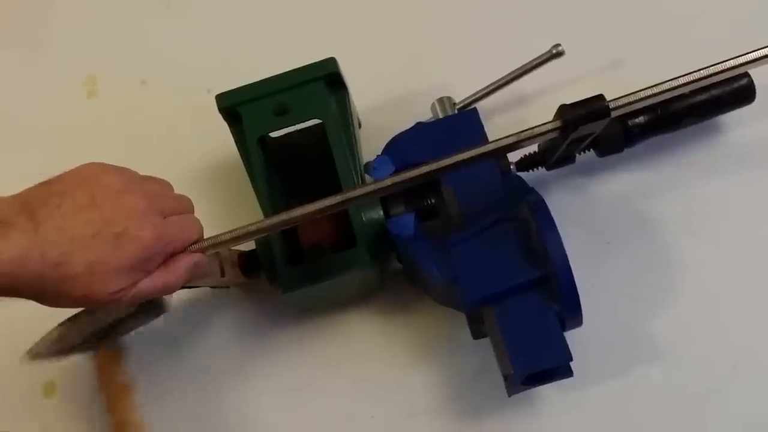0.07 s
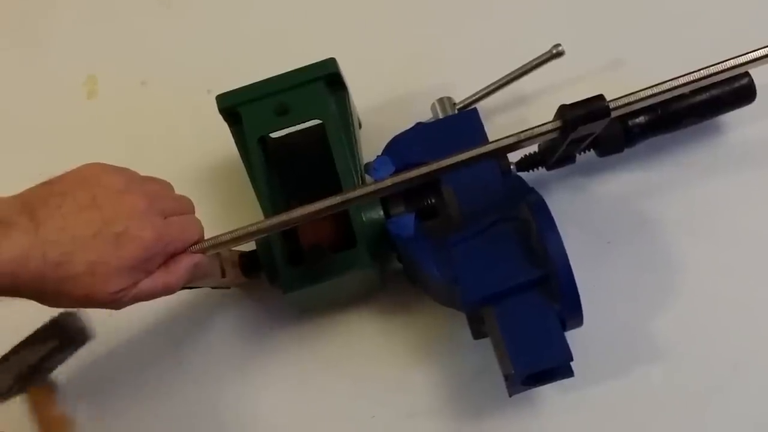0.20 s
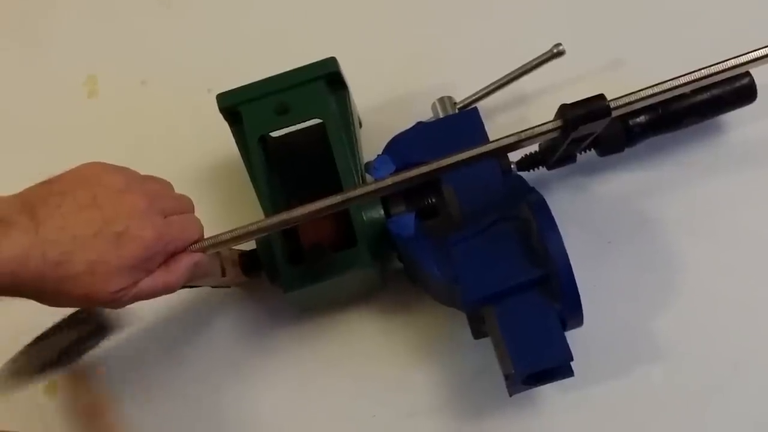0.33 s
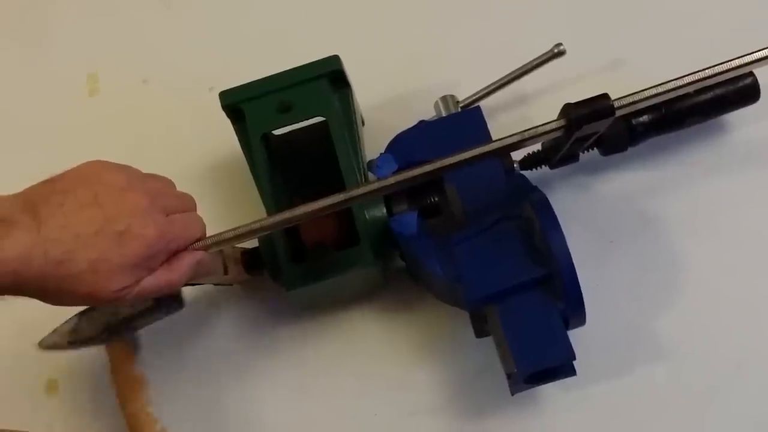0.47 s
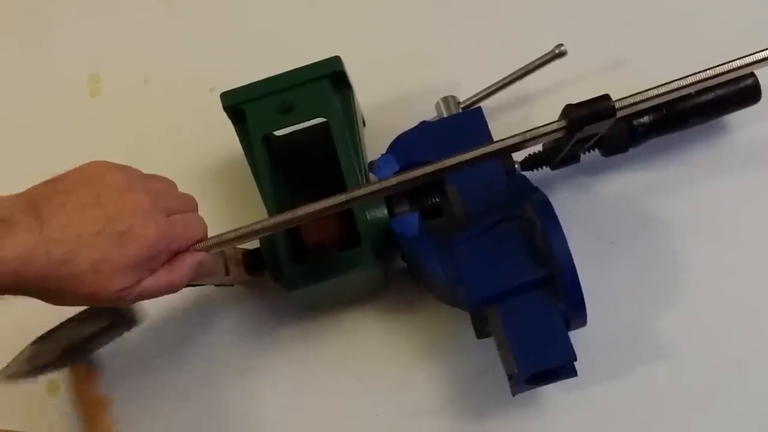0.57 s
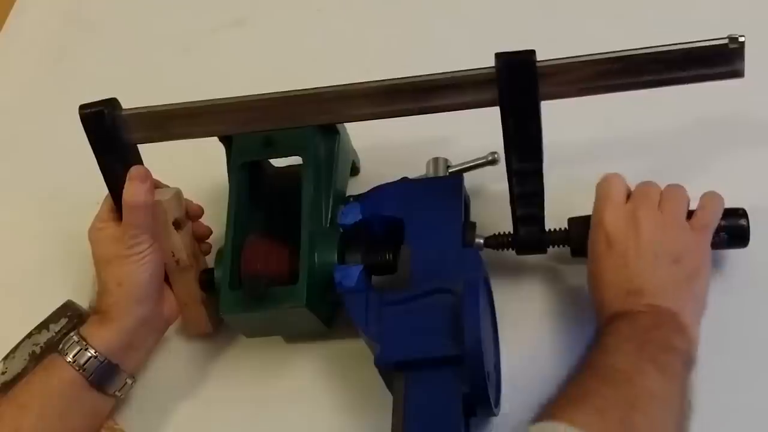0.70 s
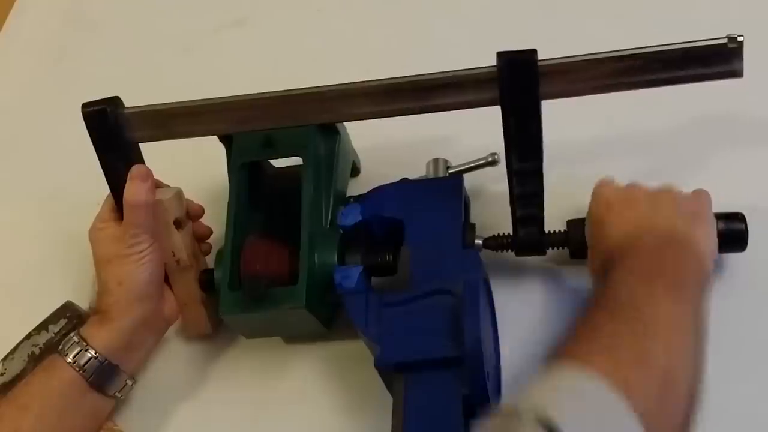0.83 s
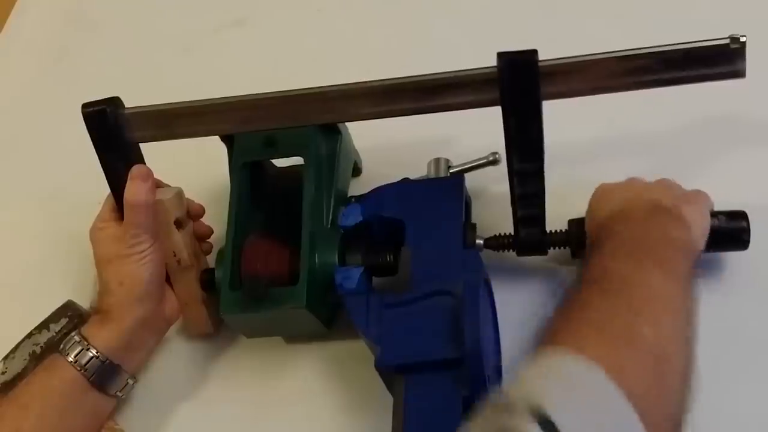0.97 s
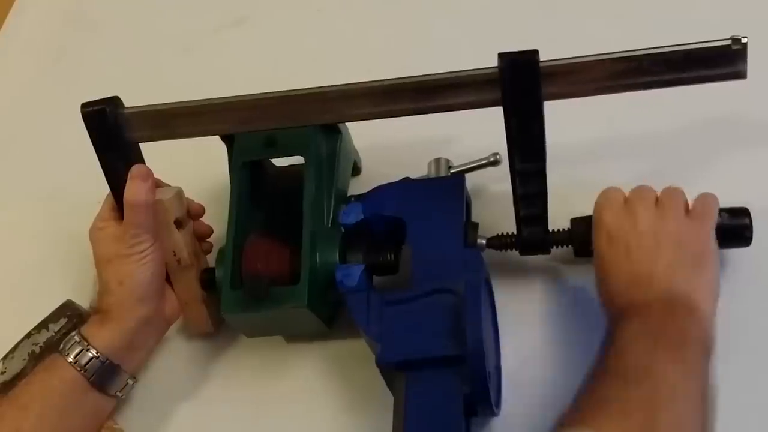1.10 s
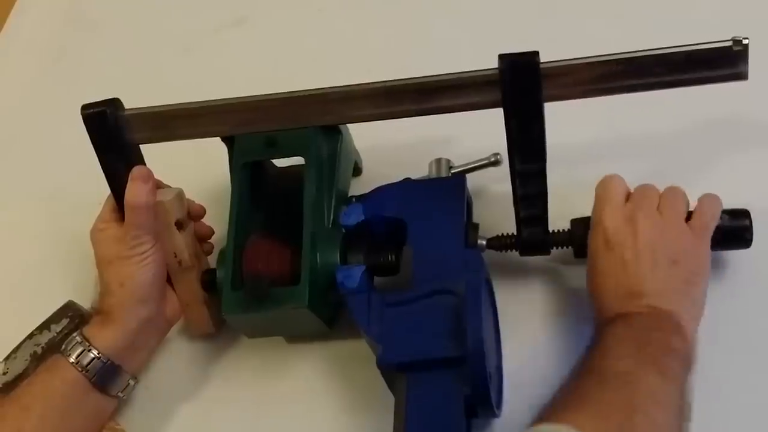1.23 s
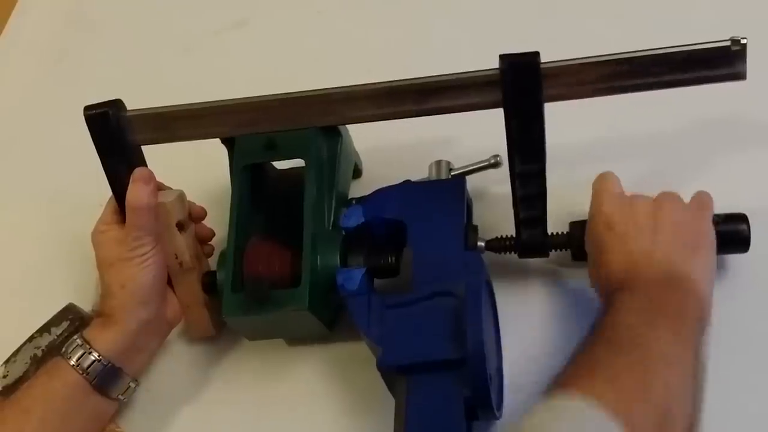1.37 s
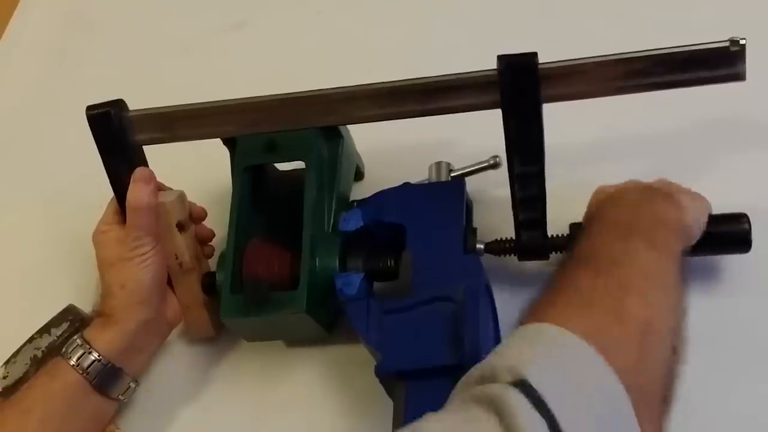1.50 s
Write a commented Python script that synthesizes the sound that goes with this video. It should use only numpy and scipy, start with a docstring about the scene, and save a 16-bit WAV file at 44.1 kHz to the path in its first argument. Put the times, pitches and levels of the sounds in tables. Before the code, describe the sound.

A hammer blow on a steel clamp bar, close and very loud, rings in a bare room over the fading tail of an earlier blow; an abrupt cut leaves quiet hiss, soft rubbing and tiny clamp ticks.

```python
"""A bare room with a table: a hammer strikes a steel clamp bar, first the tail of one blow, then a full blow.
At a cut to a second scene, the clamp screw is turned by hand: ticks, a soft rub, and a humming, juddering table.
Clicks set decaying sines ringing for the blows; filtered noise makes the room's tail, the rub and the hiss of
the microphones. Noise through resonances makes the hum, held wavering tones the judders, and tiny pushes the ticks."""
import sys
import numpy as np
from scipy import signal
from scipy.io import wavfile

SR = 44100
rng = np.random.default_rng(int(sys.argv[2]) if len(sys.argv) > 2 else 0)


def makeup_ratio(level_db):
    """Linear amplitude ratio for a level in decibels (20 dB per factor of ten)."""
    decades = np.asarray(level_db, float) / 20
    return 10 ** decades


def wav_record(signal):
    """Record a signal, one row per channel, as 16-bit PCM in the file named by sys.argv[1]."""
    frames = np.transpose(np.atleast_2d(signal))
    bounded = np.clip(frames, -1, 1)
    # unit amplitude maps onto the largest positive 16-bit level
    quanta = np.round(bounded * 32767).astype(np.int16)
    wavfile.write(sys.argv[1], SR, quanta)


N = 68355
LEAD = 8820   # samples of run-in, thrown away or holding sound from before the start
CUT_S = 0.635   # the blows end and the clamp scene begins


def rms_one(x):
    """Scales a sound to an average strength (rms) of 1."""
    return x / np.sqrt(np.mean(x ** 2) + 1e-20)


def at_hz(points, hz):
    """Reads a table of (f/Hz, value) at one frequency, on a log frequency axis."""
    table_hz, values = np.transpose(points)
    return np.interp(np.log(hz), np.log(table_hz), values)


def level(rows):
    """Turns (t/s, level/dB) rows into a gain that is silent before the cut and fades in over 5 ms."""
    t = np.arange(N) / SR
    fade_in = np.clip((t - CUT_S) * 200, 0, 1)
    return makeup_ratio(np.interp(t, *np.transpose(rows))) * fade_in


def pan(db):
    """Splits a left-right difference in dB into a left and a right gain."""
    return makeup_ratio(np.array([[.5 * db], [-.5 * db]]))


def ring(push, hz, t60):
    """A resonance: a unit click starts a sine of about height 1 that falls 60 dB in t60 seconds."""
    r = makeup_ratio(-60 / (t60 * SR))
    w = 2 * np.pi * hz / SR
    return signal.lfilter([0, np.sin(w)], [1, -2 * r * np.cos(w), r * r], push + 1e-18)


def drift(rate_hz):
    """A slowly wandering random curve of spread 1: noise smoothed twice."""
    r = np.exp(-2 * np.pi * rate_hz / SR)
    noise = rng.standard_normal(N + LEAD)
    return rms_one(signal.lfilter([1], [1, -2 * r, r * r], noise)[LEAD:])


def bands(spectrum, likeness, size, t60s=None):
    """Stereo noise in sixth-octave bands, each with its level, left-right likeness and optional decay."""
    out, t = 0, np.arange(size) / SR
    edges = 30 * 2 ** np.arange(0, 9.2, 1 / 6)
    # neighbouring bands take turns with two noise pairs
    white = rng.standard_normal((2, 2, size + LEAD))
    for k, (low, high) in enumerate(zip(edges, edges[1:])):
        band = signal.butter(2, [low, high], "band", fs=SR, output="sos")
        mid, side = signal.sosfilt(band, white[k % 2])[:, LEAD:]
        hz = np.sqrt(low * high)
        alike = np.clip(at_hz(likeness, hz), -1, 1)
        fade = 1 if t60s is None else makeup_ratio(-60 * t / at_hz(t60s, hz))
        # more of the shared noise makes left and right more alike
        stereo = np.sqrt(1 + alike) * mid + np.sqrt(1 - alike) * side * [[1], [-1]]
        out = out + makeup_ratio(at_hz(spectrum, hz)) * fade * stereo
    return out


# quick touches within one blow: [t/s after the blow, relative level/dB, left-right/dB in the treble]
CONTACTS = [(0, -20, 15), (0.0006, -16.5, 7), (0.0013, -11, 9.5), (0.002, -14, 8.5), (0.0037, -18.5, 7.5),
            (0.0062, -20, 8.5), (0.0088, -23, -5), (0.0165, -24, -1)]
# short rings of bar and hammer head: [f/Hz, relative level/dB, t60/s]
STEEL = [(324, -22.5, 0.026), (613, -21, .01), (1100, -12.5, .01), (1660, -8.5, .008), (2000, -10.5, .008),
         (2600, -11, .006), (3660, -2, 0.0051), (4420, -1.5, .01), (5300, -3.5, .005), (6500, -2, 0.0093),
         (7700, -2.5, .006), (9200, -15.5, .005), (11500, -3, .008), (13800, -11, 0.0057)]
RIGHT_LAG_S, RIGHT_DULL_HZ = 0.00067, 9000   # the right side comes later and duller
FULL_PAN_HZ = 4484   # below this the left-right difference shrinks
LUCK_DB = 4.1   # random spread of each click's level


def steel_clank():
    """Each touch clicks every steel resonance with a random strength and sign, left and right apart."""
    clank = np.zeros((2, N))
    for hz, db, t60 in STEEL:
        clicks = np.zeros((2, N))
        for after, touch_db, pan_db in CONTACTS:
            strength_luck, sign_luck = rng.normal(0, 1, (2, 2))
            sides = pan(pan_db * min(1, hz / FULL_PAN_HZ))[:, 0]
            gains = makeup_ratio(touch_db + db + LUCK_DB * strength_luck) * np.sign(sign_luck) * sides
            left_at, right_at = int(after * SR), int((after + RIGHT_LAG_S) * SR)
            clicks[[0, 1], [left_at, right_at]] += gains
        clank += ring(clicks, hz, t60)
    clank[1] = signal.lfilter(*signal.butter(1, RIGHT_DULL_HZ, fs=SR), clank[1])
    return clank


# long rings of table, bar and room: [f/Hz, level/dB relative to the blow, t60/s, left-right/dB]
TABLE = [(146.9, -34, 0.32, 0.5), (171.7, -33.5, 0.34, 0), (304.3, -39.5, .4, -1.5), (401, -42, .4, -1.5),
         (466, -44, 0.32, -2), (582.5, -40, 0.28, -3), (614.6, -36, 0.44, -2), (794, -43.5, .35, -1),
         (871, -39.5, .4, -1), (1971, -41, .5, -1), (2440, -37, .4, 1), (3320, -41, 0.61, 0.5),
         (3593, -37.5, 0.26, 1.5), (3742, -38, 0.41, 0.5), (4276, -36.5, 0.49, 0), (4270, -37, .42, -2.5),
         (4500, -39, .45, -2), (4640, -37.5, 0.44, -1), (5920, -45.5, 0.31, -0.5), (6266, -38.5, 0.39, 6.5),
         (7790, -36, .4, 6.5)]
RING_RISE_S = 0.002


def long_rings():
    """One click starts many slowly dying sines, which swell in softly over a few milliseconds."""
    t = np.arange(N) / SR
    hit = (t == 0) * 1.
    rings = sum(makeup_ratio(db) * pan(pan_db) * ring(hit, hz, t60) for hz, db, t60, pan_db in TABLE)
    return rings * (1 - np.exp(-t / RING_RISE_S))


def low_push():
    """The low push of the blow: one click into a short 90 Hz resonance, leaning left."""
    hit = (np.arange(N) == 0) * 1.
    return makeup_ratio(-31) * pan(16.5) * ring(hit, 90, t60=.025)


# colour of the room's tail: [f/Hz, relative level/dB per Hz]
ROOM = [(53, -61), (90, -26), (173, -1.5), (245, -19), (312, -1.5), (353, -24.5), (451, -8.5), (520, -16),
        (565, -8.5), (782, -10), (1230, -11.5), (1470, -6), (2080, -5), (2400, -5), (3070, -10), (3690, 0),
        (5430, -8.5), (6400, -3.5), (7850, -2), (8870, -20), (11800, -5.5), (15300, -43.5), (22000, -120)]
# how fast the tail dies: [f/Hz, t60/s]
ROOM_T60 = [(60, 0.17), (160, 0.37), (420, 0.42), (1100, 0.49), (2900, 0.49), (4200, 0.49), (7700, 0.42),
            (11000, 0.36)]
# how alike left and right are: [f/Hz, likeness from -1 to 1]
ROOM_LIKENESS = [(60, 0.63), (180, 0.71), (550, 0.2), (1650, -0.0), (4970, -0.19), (15000, 0.04)]
ROOM_DB, ROOM_PAN_DB = -19.5, 2   # relative to the blow, before the soft rise
ROOM_RISE_S, ROOM_TOP_HZ = 0.0098, 12300


def room_tail():
    """The many echoes of a bare room blur into noise that rises softly and dies at its own pace per band."""
    t = np.arange(N) / SR
    tail = bands(ROOM, ROOM_LIKENESS, size=N, t60s=ROOM_T60)
    tail = signal.sosfilt(signal.cheby2(10, 50, ROOM_TOP_HZ, fs=SR, output="sos"), tail)
    # the strength of the first 50 ms sets the level
    start_rms = np.sqrt(np.mean(tail[:, :2205] ** 2))
    tail = makeup_ratio(ROOM_DB) * pan(ROOM_PAN_DB) * tail / start_rms
    return tail * (1 - np.exp(-t / ROOM_RISE_S))


# hammer blows; the first falls before the start, so only its tail is heard: [t/s, gain level/dB]
BLOWS = [(-0.15, -1.5), (0.2383, 2.5)]


def hammer():
    """Each blow adds a fresh steel clank to the same long rings, low push and room tail."""
    out = np.zeros((2, N + LEAD))
    after_blow = room_tail() + long_rings() + low_push()
    for s, blow_db in BLOWS:
        blow = makeup_ratio(blow_db) * (steel_clank() + after_blow)
        i = int(s * SR) + LEAD
        n = min(N, N + LEAD - i)
        out[:, i:i + n] += blow[:, :n]
    fade_out = np.clip((CUT_S - np.arange(N) / SR) * 200, 0, 1)   # the last 5 ms before the cut
    return out[:, LEAD:] * fade_out


# colour of the hiss: [f/Hz, relative level/dB per Hz]
HISS = [(18, -49), (30, -19), (77, -17.5), (133, -8.5), (219, -19.5), (249, -12), (443, -23.5), (728, -40),
        (945, -31.5), (1360, -32.5), (1720, -46.5), (2020, -36.5), (4090, -51), (7080, -20.5),
        (11000, -43.5), (14000, -33.5), (15500, -62)]
# how alike left and right are, also used for the rub: [f/Hz, likeness from -1 to 1]
HISS_LIKENESS = [(60, 0.63), (180, 0.93), (550, -0.098), (1650, 0.01), (4970, -0.01), (15000, -0.01)]
HISS_DB, BEFORE_CUT_DB = -66.5, -7.5   # level after the cut; change to it before the cut


def microphone_hiss():
    """The microphones' steady coloured noise, which steps up in level at the cut."""
    t = np.arange(N) / SR
    hiss = rms_one(bands(HISS, HISS_LIKENESS, size=N))
    return hiss * makeup_ratio(HISS_DB + BEFORE_CUT_DB * (t < CUT_S))


# strength of the rub, before the grains: [t/s, level/dB]
RUB = [(.63, -68), (.7, -72.5), (.89, -74), (.92, -68.5), (.96, -66), (.97, -61.5), (1.02, -64.5),
       (1.05, -71), (1.11, -68.5), (1.15, -70), (1.18, -65.5), (1.22, -70), (1.27, -73), (1.35, -72),
       (1.37, -66.5), (1.4, -72), (1.455, -70.5), (1.465, -65.5), (1.55, -66.5)]
# colour of the rub: [f/Hz, relative level/dB per Hz]
RUB_COLOUR = [(300, -26), (600, -1.5), (1200, -6), (2200, -7.5), (4000, -10), (5500, -10), (9000, -12),
              (12000, -21), (14500, -18), (16000, -48)]
RUB_GRAINS_DB, RUB_GRAINS_HZ = 1, 150   # spread and pace of the random unevenness


def rub():
    """Hands and screw rubbing: coloured noise that swells and fades, with fine random unevenness."""
    noise = rms_one(bands(RUB_COLOUR, HISS_LIKENESS, size=N))
    grains = makeup_ratio(RUB_GRAINS_DB * drift(RUB_GRAINS_HZ))
    return noise * level(RUB) * grains


# table top humming under the hands, before the bass is thinned: [t/s, level/dB]
HUM = [(0.63, -77), (0.69, -87), (0.7, -82), (0.772, -64), (0.798, -77), (0.9, -85.5), (0.91, -70.5),
       (0.954, -81), (0.98, -51.5), (1.022, -64), (1.04, -59), (1.204, -72), (1.228, -92.5), (1.274, -79),
       (1.298, -82), (1.32, -62.5), (1.532, -65.5), (1.55, -75)]
# resonances of the loaded table: [f/Hz, width/Hz (nominal, wider dies sooner), relative level/dB]
BOARD = [(80, 30, -18), (130, 11, -1.5), (152, 33, -1.5), (184, 42, 6), (253, 45, -8.5), (350.4, 24, -1.5),
         (420, 54, -20), (609, 51, -20)]
HUM_LUMPS_DB, HUM_LUMPS_HZ = 3.0, 30   # spread and pace of the lumps
HUM_LOW_HZ = 95   # the hum is thinned below this


def table_hum():
    """Lumpy noise shakes the table's resonances, so the top hums unevenly."""
    noise = rng.standard_normal(N) * makeup_ratio(HUM_LUMPS_DB * drift(HUM_LUMPS_HZ))
    resonances = sum(makeup_ratio(db) * rms_one(ring(noise, hz, 3.0 / width)) for hz, width, db in BOARD)
    hum = rms_one(resonances) * level(HUM)
    return signal.sosfilt(signal.butter(2, HUM_LOW_HZ, "high", fs=SR, output="sos"), hum)


# judders of the table: [t/s, length/s, f/Hz before the wobble, level/dB of the main tone]
JUDDERS = [(0.76, 0.033, 129, -56), (0.974, 0.059, 130, -51.5), (1.315, 0.027, 144.8, -57),
           (1.372, 0.017, 140, -54.5)]
EDGE_S = 0.0055   # fade at either end
WOBBLE, WOBBLE_HZ = 0.047, 13   # spread of the pitch as a fraction, and its pace
OVERTONE_DB = -16   # the octave above, relative to the main tone


def table_judders():
    """Short held tones with an overtone, their pitch wavering, as the table judders under the load."""
    out, t = np.zeros(N), np.arange(N) / SR
    wobble = 1 + WOBBLE * drift(WOBBLE_HZ)
    for s, length, hz, db in JUDDERS:
        phase = 2 * np.pi * hz * np.cumsum(wobble * (t > s)) / SR
        shape = np.clip(np.minimum(t - s, s + length - t) / EDGE_S, 0, 1)
        tone = np.sin(phase) + makeup_ratio(OVERTONE_DB) * np.sin(2 * phase)
        out = out + makeup_ratio(db) * shape * tone
    return out


# ticks of the clamp: [t/s, peak level/dB before panning, f/Hz, t60/s, left-right/dB]
TICKS = [(0.9149, -65, 3200, .012, 8), (0.9650, -51, 3950, 0.0051, 16), (0.965, -53.5, 2550, .006, 7),
         (0.9660, -62, 3200, 0.0054, 2), (0.9668, -56, 4600, 0.0065, 4), (0.9727, -59, 2000, 0.0068, -4.5),
         (1.171, -60.5, 791, 0.038, 3), (1.177, -63, 1510, 0.0084, 8), (1.18, -63.5, 2090, 0.039, -4.5),
         (1.3652, -46.5, 930, 0.0019, -20), (1.366, -63, 3800, .003, -11.5),
         (1.3672, -56.5, 2000, .004, -17), (1.462, -57, 890, 0.005, 3.5), (1.463, -59, 2600, 0.0048, 1),
         (1.484, -59, 605, .01, 5)]


def ticks():
    """Single small contacts: the part is pressed in and springs back, then rings briefly."""
    out, t = 0, np.arange(N) / SR
    for s, db, hz, t60, pan_db in TICKS:
        press = -np.sin(2 * np.pi * np.clip((t - s) * hz, 0, 1))   # one cycle: in, then back
        rung = ring(press, hz, t60)
        out = out + makeup_ratio(db) * pan(pan_db) * rung / np.abs(rung).max()
    return out


def scene():
    """Over the hiss: the blows, then the handled clamp and table."""
    return microphone_hiss() + rub() + hammer() + table_hum() + table_judders() + ticks()


OVERLOAD = 1.0   # loud peaks are rounded towards this height
BASS_CUT_HZ, TOP_CUT_HZ = 33, 15600


def top_cut(x):
    """Nothing passes above the cut-off."""
    return signal.sosfilt(signal.butter(12, 15680, fs=SR, output="sos"), x)


def record(dry):
    """Loud peaks are softly rounded, then the deep bass and the very top are cut away."""
    rounded = OVERLOAD * np.tanh(dry / OVERLOAD)
    cut = signal.sosfilt(signal.butter(2, BASS_CUT_HZ, "high", fs=SR, output="sos"), rounded)
    cut = signal.sosfilt(signal.cheby2(12, 70, TOP_CUT_HZ, fs=SR, output="sos"), cut)
    return top_cut(cut)


dry = scene()
out = record(dry)
wav_record(out)
```